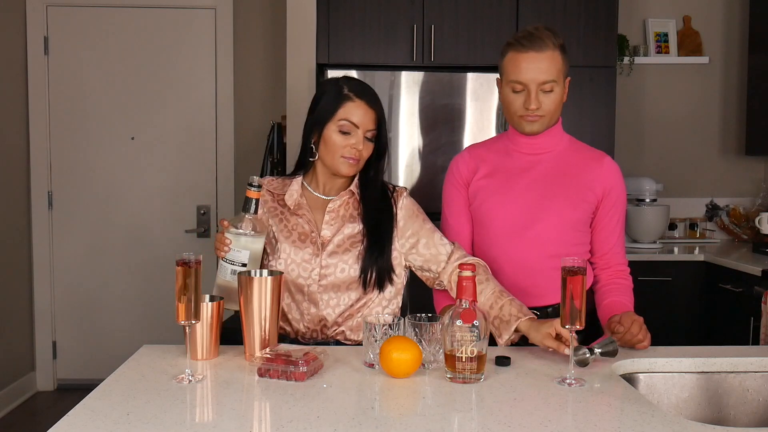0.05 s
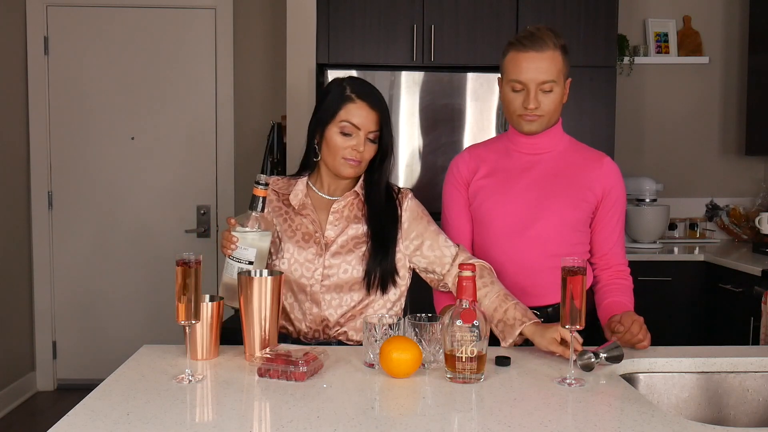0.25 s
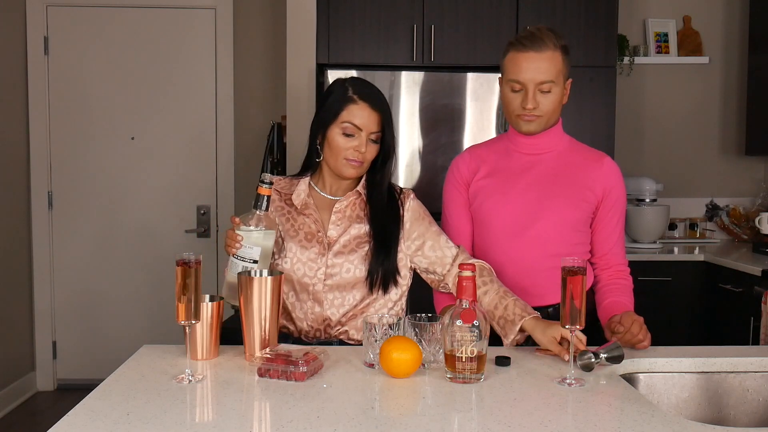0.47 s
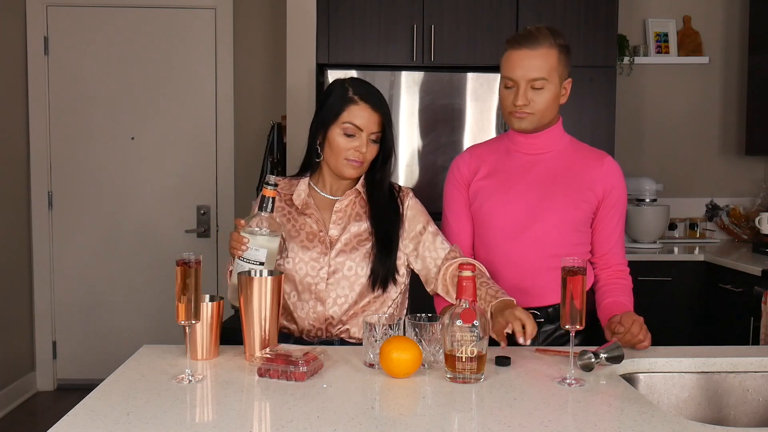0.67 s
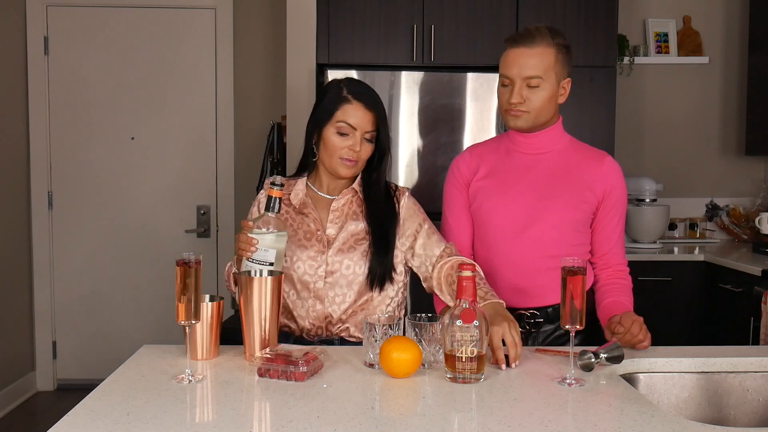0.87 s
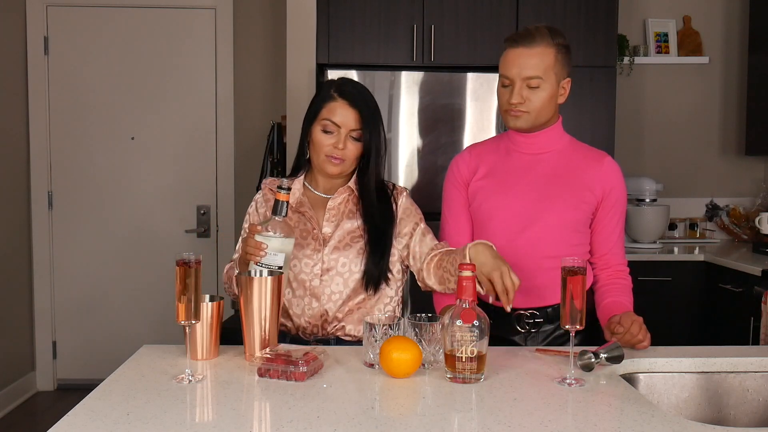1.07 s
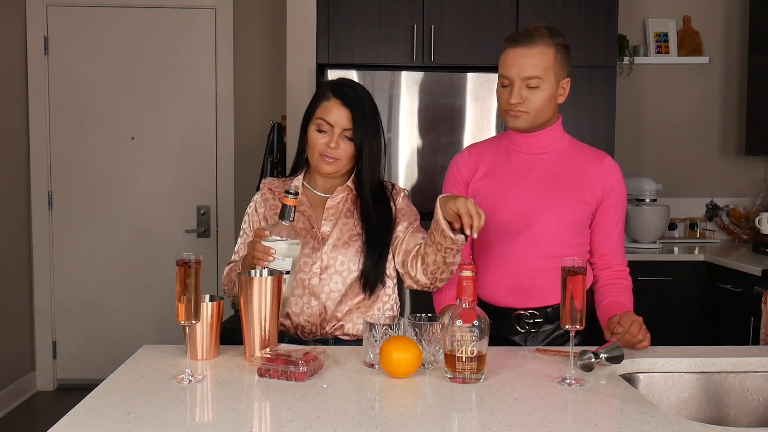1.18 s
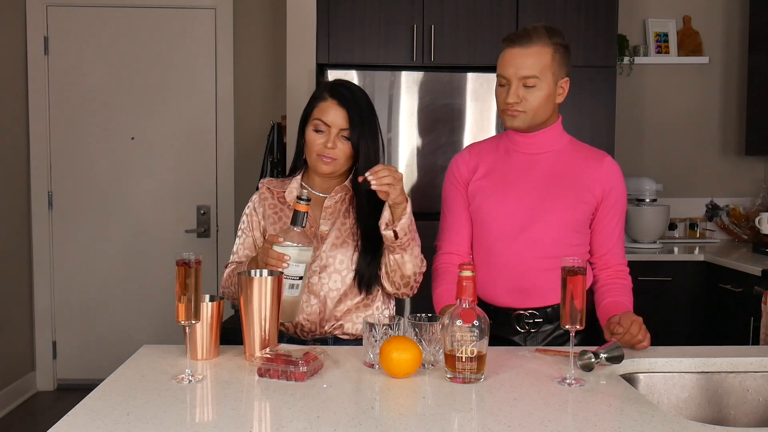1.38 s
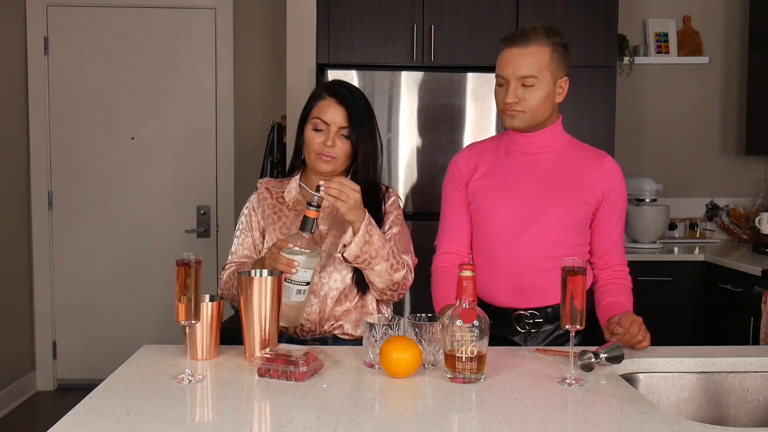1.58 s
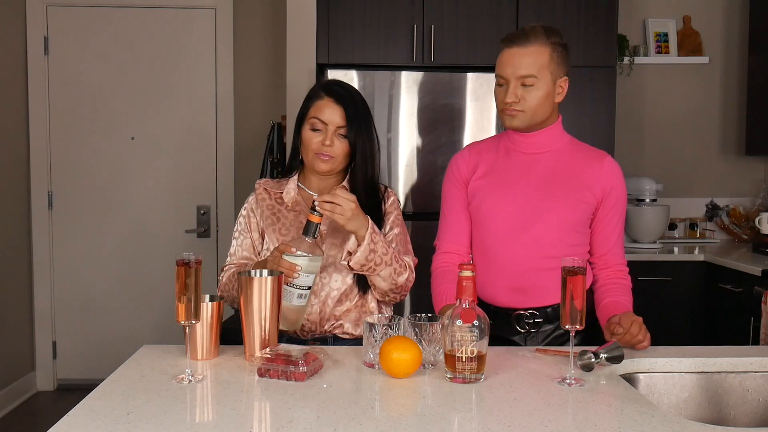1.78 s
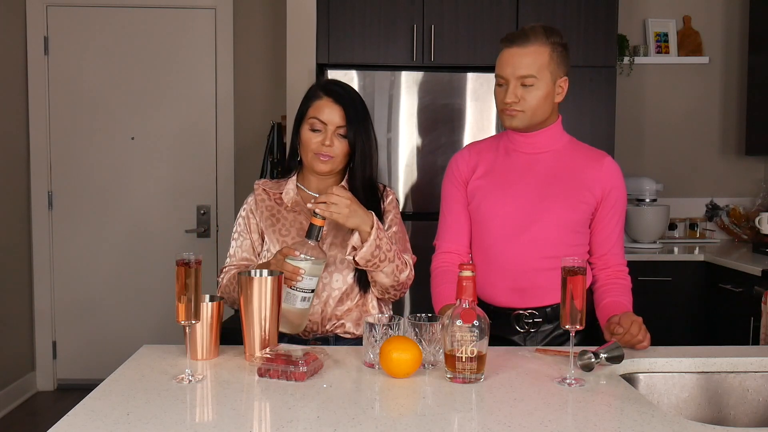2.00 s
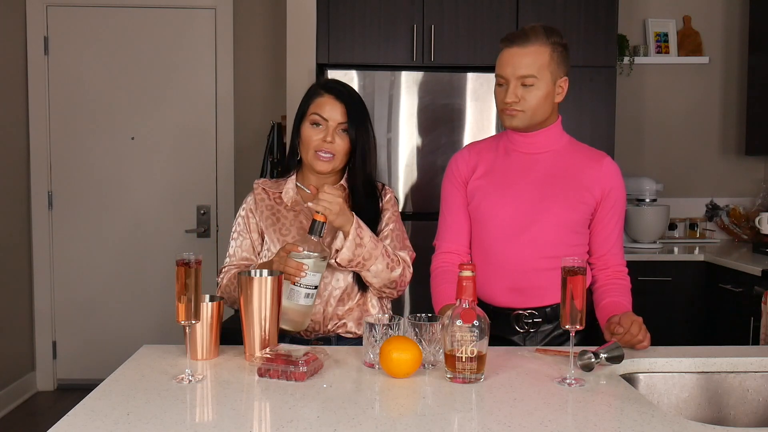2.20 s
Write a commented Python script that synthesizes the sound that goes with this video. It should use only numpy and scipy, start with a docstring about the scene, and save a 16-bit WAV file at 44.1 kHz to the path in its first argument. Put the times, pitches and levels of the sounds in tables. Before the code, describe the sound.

A small steel bar measure clatters onto a stone counter, then a brief lip smack.

```python
"""An appliance hums over soft air noise in a live kitchen. A steel two-cup bar measure is set down on
the stone counter: it taps twice, chatters on its rim, drops on its side and rocks to rest, each impact
exciting the modes of rim, cups and counter. As the ringing dies, a gentle expander lets the background
sink. Later comes one short, bright smack, probably lips on a fingertip: tiny clicks through resonances."""
import sys
import numpy as np
from scipy import signal
from scipy.fft import rfft, irfft, next_fast_len
from scipy.io import wavfile
from scipy.ndimage import uniform_filter1d

SR = 44100
rng = np.random.default_rng(int(sys.argv[2]) if len(sys.argv) > 2 else 0)


def wav_out(sig):
    """Save sig, one row per channel (or a flat mono array), as 16-bit PCM at SR to the path in sys.argv[1]."""
    wavfile.write(sys.argv[1], SR, np.round(np.clip(np.atleast_2d(sig).T, -1, 1) * 32767).astype(np.int16))


N = 99225
T = np.arange(N) / SR
TAIL = T[:SR * 2 // 3]  # time axis of one decay
CONTACT_S = .0036  # duration of a steel-on-stone impact


def amp(db):
    """Amplitude ratio of a level in decibels."""
    return 10 ** (np.asarray(db) / 20)


def unit(x):
    """Normalisation to rms 1."""
    return x / np.sqrt(np.mean(x ** 2) + 1e-20)


def read(points, hz):
    """Interpolation on a log-frequency axis."""
    f, value = np.transpose(points)
    return np.interp(np.log(hz + 1), np.log(f + 1), value)


def add(mix, start_s, sound):
    """Superposition of a delayed sound."""
    part = mix[round(start_s * SR):][:len(sound)]
    part += sound[:len(part)]


def fade(t, t60):
    """Exponential decay, 60 dB in t60 seconds."""
    return np.exp(-np.log(1000) * t / t60)


def convolve(x, response):
    """Linear filtering by an impulse response scaled to unit energy."""
    response = response / np.linalg.norm(response)
    size = next_fast_len(len(x) + len(response), True)
    return irfft(rfft(x, size) * rfft(response, size), size)[:N]


def colour(x, points, size=4096):
    """Minimum-phase filtering to a given spectral shape."""
    log_gain = np.log(amp(read(points, abs(np.fft.fftfreq(size, 1 / SR)))))
    spectrum = np.exp(np.conj(signal.hilbert(log_gain)))
    return convolve(x, np.fft.ifft(spectrum).real[:size // 2])


def ring(modes):
    """Free vibration as a sum of damped sinusoids."""
    return sum(amp(db) * fade(TAIL, t60) * np.sin(2 * np.pi * hz * TAIL) for hz, db, t60 in modes)


def clicks(per_s, spread_db):
    """Shot noise: random impulses of uneven size, rms 1."""
    size = amp(spread_db * np.minimum(rng.exponential(1, N), 3)) * rng.choice([-1, 1], N)
    return unit(size * (rng.random(N) < per_s / SR))


def room(x, wet_db, build_s):
    """Reverberation: a diffuse field builds up, then each band decays at its own rate."""
    # Kitchen reverberation times: frequency_hz, t60_s
    decay_times = [(100, 0.45), (500, 0.33), (1500, 0.33), (3200, 0.496), (6000, 0.49), (9000, .31),
                   (14000, 0.13)]
    hz, t, bands = signal.stft(rng.standard_normal(len(TAIL)), SR, nperseg=256)
    tail = signal.istft(bands * fade(t, read(decay_times, hz)[:, None]), SR)[1][:len(TAIL)]
    tail *= np.minimum(TAIL / build_s, 1)
    tail *= np.exp(-(TAIL / .25) ** 4)  # the decay steepens near 0.25 s
    return x + amp(wet_db) * convolve(x, tail)


def background():
    """Beating: an appliance hums with three close tones over broadband air noise."""
    # Appliance tones: pitch_hz, level_db
    tones = [(312.0, -63.5), (340, -72.5), (368.6, -66.5)]
    # Spectral density of the air noise: frequency_hz, relative_db
    air_spectrum = [(25, -42.5), (60, -23), (120, -6.5), (200, -3.5), (300, -3), (520, -3), (950, -1.5),
                    (2000, -8.5), (4200, -12.5), (7500, -17), (11000, -23), (15800, -30.5)]
    hum = sum(amp(db) * np.sqrt(2) * np.sin(2 * np.pi * (hz * T + rng.random())) for hz, db in tones)
    air_gain = amp(read(air_spectrum, np.fft.rfftfreq(N, 1 / SR)))
    air = irfft(rfft(rng.standard_normal(N)) * air_gain, N)
    return hum + amp(-62) * unit(air)


def smack():
    """Source and filter: a brief swell of wet clicks excites cavity resonances."""
    # Spectrum of the clicks: frequency_hz, relative_db
    click_spectrum = [(60, -80.5), (700, -60.5), (1150, -39.5), (1500, -0.5), (1900, -18), (2300, -10.5),
                      (2700, 0.5), (3100, 3.5), (3400, -4.5), (3900, 3), (5500, -4), (7400, 0.5),
                      (8800, -7), (9800, -29.5), (12000, -28), (14500, -55.5)]
    # Cavity resonances: pitch_hz, relative_db, t60_s
    cavity_modes = [(1490, 0, .03), (1590, -2, .03), (2537, -6, .07), (3030, -7, .07), (3100, -4, .07),
                    (3790, -11, .04), (4057, -12, .12)]
    start_s, rise_s = 1.670, .02315
    t = np.maximum(T - start_s, 0)
    swell = np.minimum(t / rise_s, 1) ** 2 * fade(np.maximum(t - rise_s, 0), t60=.0703)
    clicking = colour(amp(-22.5) * swell * clicks(per_s=3000, spread_db=4), click_spectrum)
    cavity = convolve(clicking, ring(cavity_modes))
    return room(amp(-3.5) * clicking + amp(-17) * cavity, wet_db=2.5, build_s=.0064)


def cup(modes, blows):
    """Energy balance: each blow (start_s, level_db) feeds every mode, and damping drains it."""
    supply, ringing = np.zeros((2, N))
    for start_s, db in blows:
        add(supply, start_s, amp(db) ** 2 * np.diff(np.minimum(TAIL / CONTACT_S, 1) ** 3))
    for hz, db, t60 in modes:
        energy = signal.lfilter([1], [1, -fade(1 / SR, t60) ** 2], supply)
        ringing += amp(db) * np.sqrt(energy) * np.sin(2 * np.pi * (hz * T + rng.random()))
    return ringing


def bar_measure():
    """Impact excitation: blows crack and set rim, cups and counter ringing; chatter shakes the small cup."""
    # Steel-on-stone blows, relative levels: start_s, crack_db, rim_db, big_cup_db, small_cup_db, thud_db
    blows = [(0.162, -36.5, -25, -55, -37, -60), (0.2228, -23.5, -24, -53.5, -38.5, -57),
             (0.2489, -22.5, -40, -50, -39.5, -43), (0.2822, -32.5, -34.5, -55.5, -23, -64.5),
             (.3080, -31.5, -40, -49, -24, -58), (.3270, -28.5, -36, -47.5, -24.5, -54.5),
             (0.3756, -18.5, -17, -13.5, -38.5, -20.5), (0.4014, -24.5, -35, -24, -37, -34),
             (0.4434, -26.5, -32, -34.5, -24.5, -38), (.4730, -30, -33, -31, -28, -60),
             (.4950, -29, -49, -34.5, -35.5, -60.5)]
    # Envelope of the rim's chatter: time_s, relative_db
    chatter_levels = [(.222, -48.5), (.245, -39.5), (.28, -31), (.33, -32), (.365, -38.5), (.39, -30),
                      (.45, -28), (.49, -38), (.51, -60.5), (.56, -53)]
    # Spectra of the contact and of the counter's thud: frequency_hz, relative_db
    crack_spectrum = [(60, -65), (300, -44), (600, -30.5), (850, -9.5), (1300, -13), (1700, -9), (2500, -9),
                      (2900, -6.5), (3400, -6.5), (4100, -6.5), (5200, -0.5), (6400, -3.5), (7700, -0.5),
                      (8300, -4), (9600, 0.5), (10300, -10.5), (10900, -35.5), (11900, -11.5),
                      (12650, -33.5), (13450, -11.5), (14100, -29.5), (14500, -21), (15800, -35.5)]
    thud_spectrum = [(25, -54.5), (55, -36.5), (95, -16), (250, -10.5), (600, -1.5), (1000, 9), (1250, -5),
                     (1700, -1.5), (3000, -14.5), (6000, -24.5)]
    # Modes of the rim, counter and cups: pitch_hz, relative_db, t60_s
    rim_modes = [(1025, -22.5, 0.031), (1591.4, -26, 0.45), (3312.7, -8, 0.056), (3525.4, -4, 0.022),
                 (4706, -20.5, 0.082), (5290, 1, 0.016), (7118, -15, 0.061), (7290, 0.5, 0.021),
                 (9560, -2, 0.018)]
    counter_modes = [(868, -10, .17), (958, -8, .14), (1014, 0, .26), (1653, -11, .22), (2428, -7, .3)]
    big_modes = [(3273, -15, .3), (4731, -10, .28), (4875, -12, .33), (4931, -8, .33), (4970, -7, .33),
                 (5002, -12, .27), (5049, -13, .25), (5202, -10, .27), (6191, -14, .25)]
    small_modes = [(6375, -13, .22), (7024, -6, .26), (7582, -15, .22), (8821, 3, .21), (8866, -4, .26),
                   (11806, -23, .23), (13286, -19, .16), (13738, -22, .15)]
    free_modes = [(6892, -3, .4976), (7047, -11.5, .33)]  # small cup, once the fingers let go
    let_go_s = .42

    contact = np.minimum(TAIL / CONTACT_S, 1)
    pulse, onset = np.sin(np.pi * contact), np.sin(np.pi / 2 * contact) ** 2
    rim, counter = ring(rim_modes), amp(-4.5) * ring(counter_modes)
    cracks, pings, thuds = np.zeros((3, N))
    on_big, on_small = [], []
    for start_s, crack_db, rim_db, big_db, small_db, thud_db in blows:
        grit, knock = rng.standard_normal((2, len(TAIL)))
        add(cracks, start_s, amp(crack_db) * pulse * grit)
        add(pings, start_s, onset * (amp(rim_db) * rim + amp(thud_db) * counter))
        add(thuds, start_s, amp(thud_db) * onset * fade(TAIL, t60=.055) * knock)
        on_big.append((start_s, big_db))
        on_small.append((start_s, small_db))
    on_free = [(start_s, db) for start_s, db in on_small if start_s > let_go_s]
    rings = cup(big_modes, on_big) + cup(small_modes, on_small) + cup(free_modes, on_free)

    chatter_db = np.interp(T, *np.transpose(chatter_levels), left=-120, right=-120)
    chatter = amp(chatter_db) * clicks(per_s=600, spread_db=3)
    jangle = amp(-4.5) * convolve(chatter, onset * ring(small_modes))
    clatter = colour(amp(-.5) * cracks + amp(-2.5) * chatter, crack_spectrum)
    return (room(clatter, wet_db=1.5, build_s=.0045)
            + room(colour(thuds, thud_spectrum), wet_db=1.5, build_s=.005)
            + room(pings, wet_db=-6.5, build_s=.007)
            + room(rings + jangle, wet_db=-6.5, build_s=.006))


def scene():
    """Superposition of all sources at one microphone."""
    return (bar_measure() + smack() + background())[None]


def record(dry):
    """Downward expansion: the gain opens on loud sounds, holds and sinks slowly; a low-pass follows."""
    threshold_db, knee_db, depth_db = -56, 9.5, 6.5
    hold_s, close_s, cutoff_hz = .19, .524, 15850
    level_db = 10 * np.log10(abs(uniform_filter1d(dry[0] ** 2, size=400)) + 1e-12)
    trigger = np.clip((level_db - threshold_db) / knee_db, 0, 1) * (1 + hold_s / close_s)
    # Each peak falls off linearly; its excess over 1 gives the hold.
    opening = np.minimum(np.maximum.accumulate(trigger + T / close_s) - T / close_s, 1)
    low_pass = signal.firwin(511, cutoff_hz, window=("kaiser", 9), fs=SR)
    return signal.oaconvolve(dry * amp(depth_db * (opening - 1)), low_pass[None], "same")


dry = scene()
out = record(dry)
wav_out(out)
```